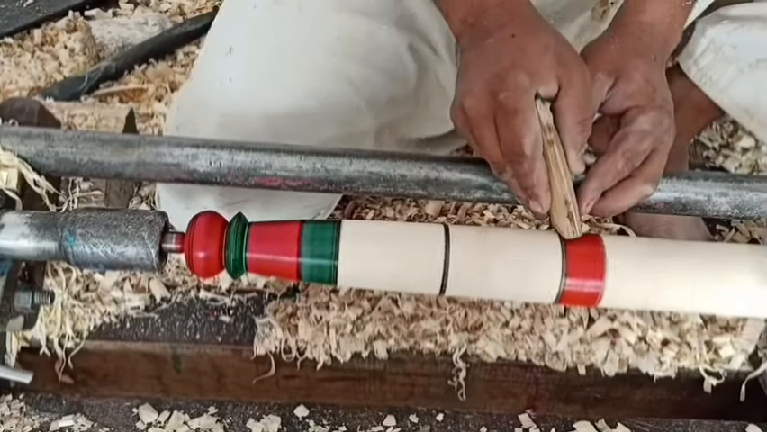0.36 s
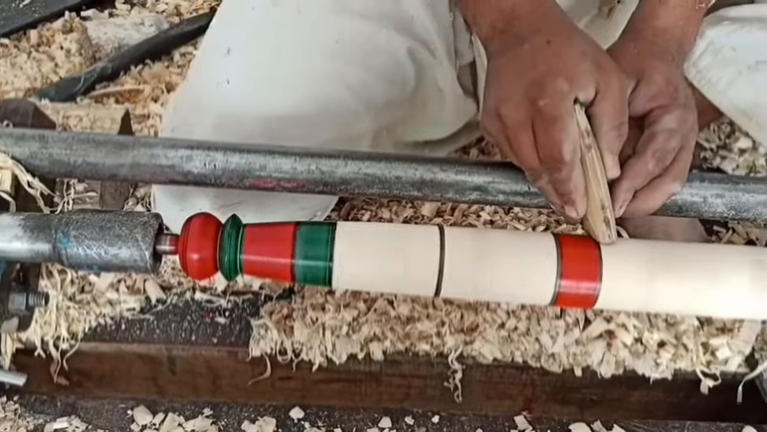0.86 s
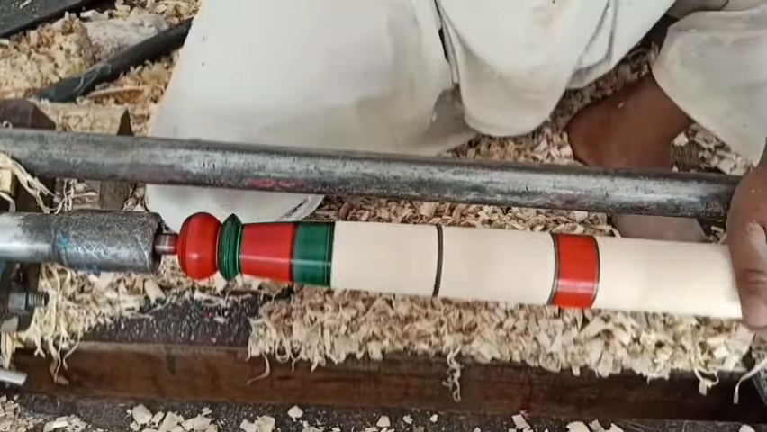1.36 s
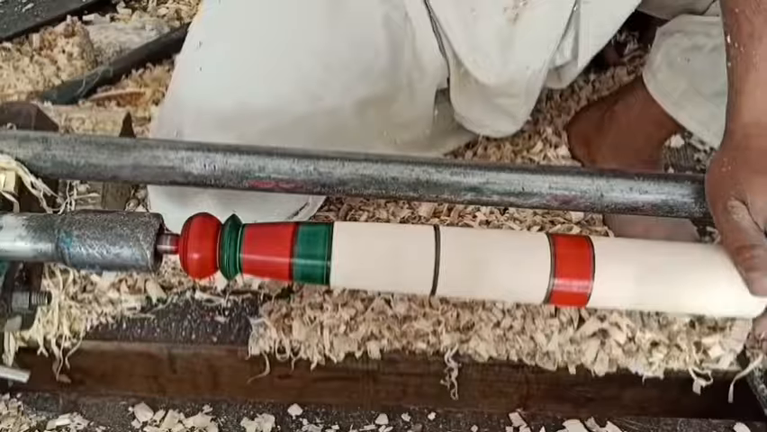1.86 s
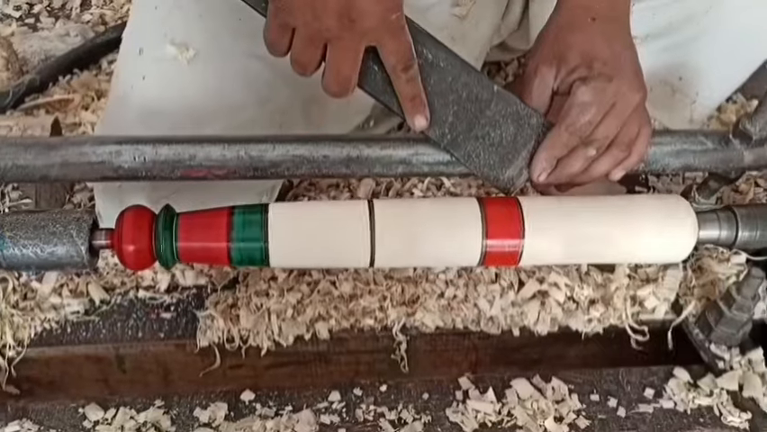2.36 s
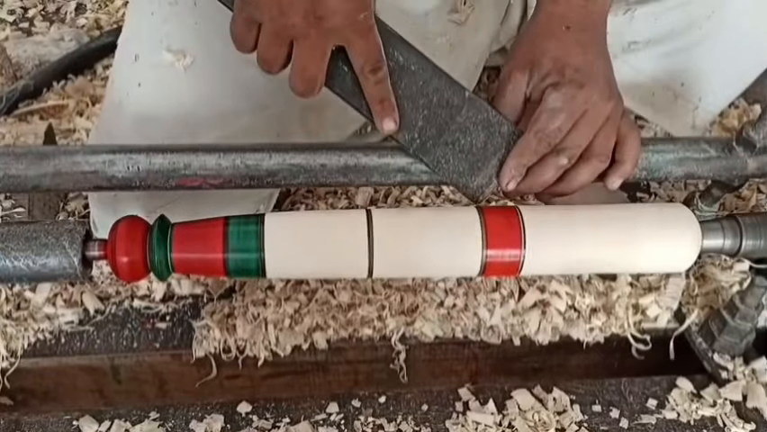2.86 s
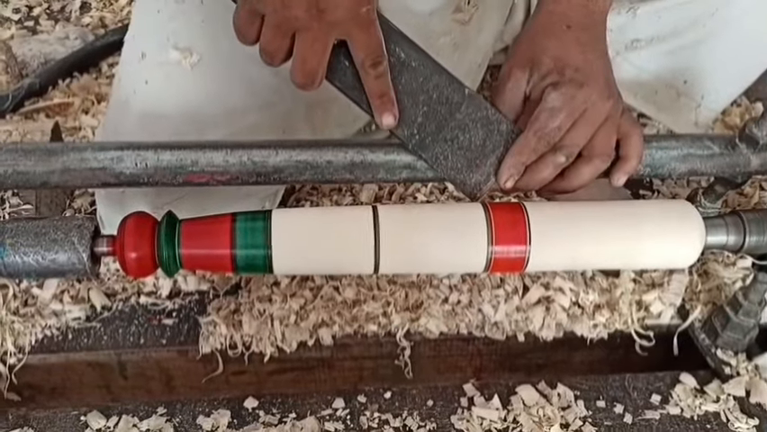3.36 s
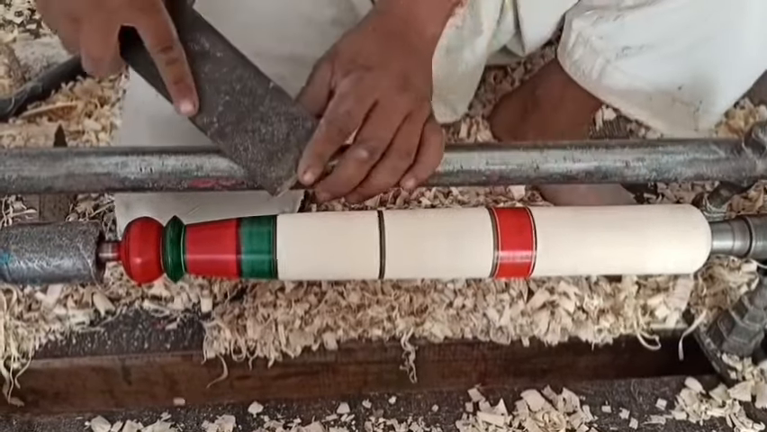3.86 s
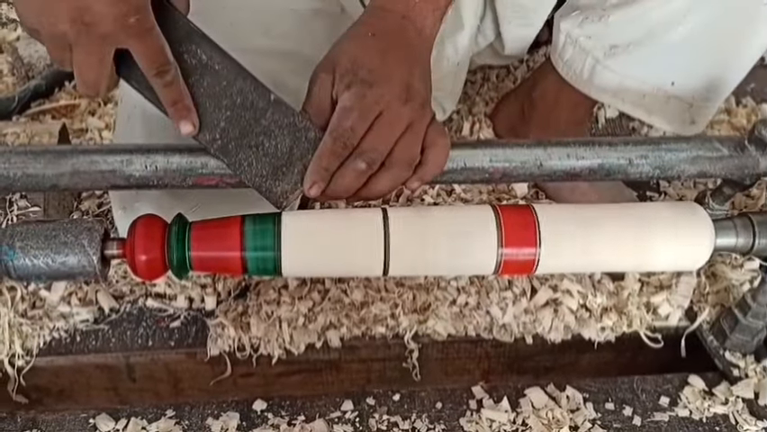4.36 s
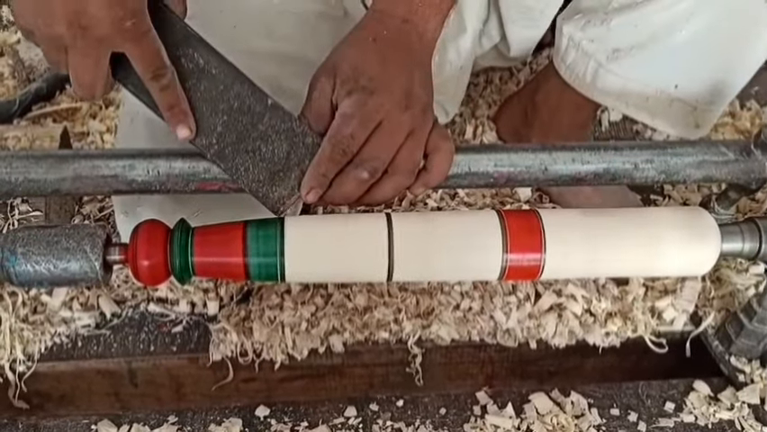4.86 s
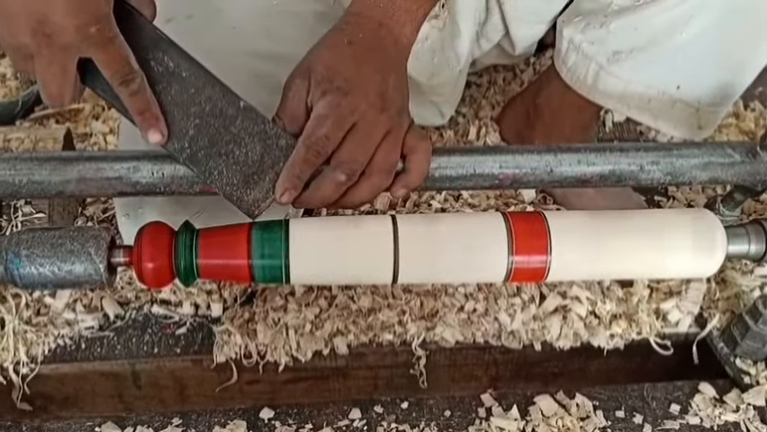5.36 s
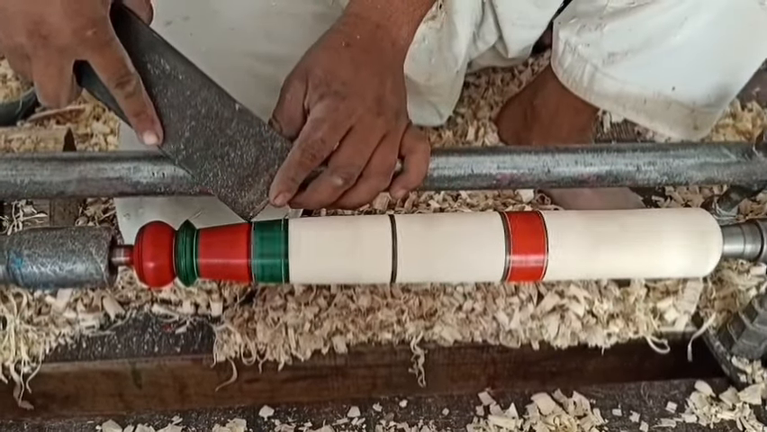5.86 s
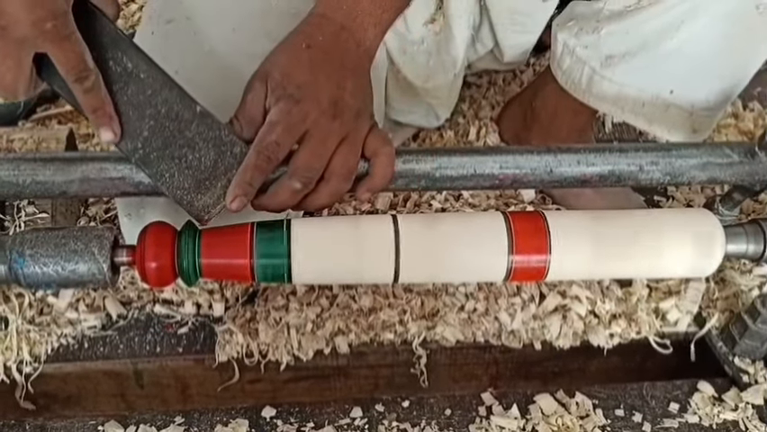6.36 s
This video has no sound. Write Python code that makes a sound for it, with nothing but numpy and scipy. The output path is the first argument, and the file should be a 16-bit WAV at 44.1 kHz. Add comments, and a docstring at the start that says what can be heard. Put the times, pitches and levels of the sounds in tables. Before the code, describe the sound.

A belt-driven wood lathe runs continuously for about 6.7 seconds, close to a stereo microphone in a small workshop, with no start or stop. A low motor hum near 100 Hz wavers with weaker overtones beneath a broad, rough roar and unsteady metallic ringing, brighter on the left. About six and a half times a second the belt joint passes: crisp high hiss flares sharply, then roar and hum sag briefly, giving a fast, slightly uneven chuffing flutter. A short high squeak comes near 1.1 s. Around 2.7 to 3.0 s soft low air puffs push on the left, with a rough squeak at 2.8. Fainter squeaks and puffs follow between 3.5 and 4.1, the clearest squeak at 4.1. The steady machine continues, with a slight puff and squeak near 6.0, another puff at 6.4, and a strong hiss flare near the end.

```python
"""In a small workshop, a belt-driven wood lathe idles at steady speed, close to a two-port microphone.
The motor hum is three wavering tones; the roar is shaped noise plus ringing tones for the lathe's parts.
The belt hiss is shaped noise too; once a lap the belt joint makes it flare while roar and hum sag.
Bearing squeaks are short rough whistles; fan air buffets mainly the left port with soft low pushes."""
import sys
import numpy as np
from scipy import signal
from scipy.io import wavfile
from scipy.ndimage import uniform_filter1d

SR = 44100
rng = np.random.default_rng(int(sys.argv[2]) if len(sys.argv) > 2 else 0)


def ratio_of_db(decibels):
    """Turn decibels (scalar or array-like) into linear amplitude factors; 0 dB maps to 1."""
    return 10 ** (np.asarray(decibels, float) / 20)


def file_out(sig):
    """Save sig as 16-bit WAV at sys.argv[1]."""
    # one column per channel
    cols = np.atleast_2d(sig).T
    # limit, then scale
    lim = np.clip(cols, -1, 1)
    pcm = np.round(lim * 32767).astype(np.int16)
    wavfile.write(sys.argv[1], SR, pcm)


N = 296352  # length of the scene in samples


def evened(x):
    """Scales a signal to an average strength (rms) of 1."""
    return x / np.sqrt(np.mean(abs(x) ** 2) + 1e-20)


def read(points, hz):
    """Reads a table of (frequency, value) between its rows, on a log-frequency axis."""
    f, value = np.transpose(points)
    return np.interp(np.log(hz + 1), np.log(f + 1), value)


def curve(rows, column):
    """Joins the rows of a time table by straight lines and reads one column at every sample."""
    table = np.transpose(rows)
    return np.interp(np.arange(N) / SR, table[0], table[column])


def wandering(width_hz):
    """A slow random phasor of rms 1: multiplying a tone by it spreads the tone over the given width."""
    slow = np.arange(0, N + 64, 64)  # one random step every 64 samples
    re, im = rng.standard_normal((2, len(slow)))
    memory = np.exp(-np.pi * width_hz * 64 / SR)
    z = evened(signal.lfilter([1], [1, -memory], re + 1j * im))
    return np.interp(np.arange(N), slow, z.real) + 1j * np.interp(np.arange(N), slow, z.imag)


LAP_HZ = 6.525  # average belt laps a second
FIRST_PASS_S, LAP_SCATTER_S = -0.007, 0.0075
USUAL_DB = [3.9, 1.53, 3.1]  # usual hiss flare, roar sag and hum sag
UNEVEN = 0.14  # share by which the usual passes differ
# Marked passes of the belt joint, a negative sag being a swell:
# (time [s], hiss flare [dB], roar sag [dB], hum sag [dB])
MARKED_PASSES = [(.145, 4.5, 9, 8), (.294, 8.5, 2, 9), (.62, 4, 1, 7), (.75, 6, 4.5, 6), (.93, 3.5, 1, 10),
                 (1.083, 3.5, 1, 3), (1.225, 5.5, 2, 19), (1.37, 1, 0.5, 3), (1.53, 6, 5.5, 11),
                 (1.83, 4.5, 7, 12), (2.135, 4.5, 0.5, 8), (2.285, 7, 3.5, 13), (2.59, 4.5, 4, 1),
                 (2.76, 3, 4, 9), (3.06, 4, 3, 12), (3.2, 5.5, 4.5, 8), (3.355, 6.5, 1.5, 9),
                 (3.665, 6, 5.5, 34), (3.81, 2, 1, 1.5), (3.986, 6.5, 4, 6), (4.117, 5.5, 4.5, 13),
                 (4.29, 4, 3, -4), (4.59, 5.5, 4.5, 12), (4.74, 5, 2, 10), (4.904, 5.5, -0.5, 6),
                 (5.049, 5.5, 6, 19), (5.195, 4.5, 2.5, 3), (5.375, 2, 2, 9), (5.51, 5, 4.5, 5),
                 (5.83, 5, 5.5, 17), (5.965, 3, 4, 2), (6.425, 4.5, 3, 19), (6.58, 9, 3.5, 5)]


def passes():
    """Time, flare and sags of every pass of the joint: uneven by chance, except for the marked ones."""
    chance = rng.standard_normal((int(LAP_HZ * N / SR) + 2, 4))
    times = FIRST_PASS_S + np.arange(len(chance)) / LAP_HZ + LAP_SCATTER_S * chance[:, 0]
    rows = np.column_stack([times, USUAL_DB * np.exp(UNEVEN * chance[:, 1:])])
    for row in MARKED_PASSES:
        lap = round(LAP_HZ * (row[0] - FIRST_PASS_S))
        rows[lap] = row
    return rows.T


def joint(times, depth_db, late_s, rise_s, fall_s):
    """A dB curve with one hump for every pass of the joint, peaking late_s after the pass."""
    t = np.arange(0, N + 128, 128) / SR
    since = t - times[:, None] - late_s
    spread = np.where(since < 0, rise_s, fall_s)
    humps = depth_db @ np.exp(-.5 * (since / spread) ** 2)
    return np.interp(np.arange(N) / SR, t, humps)


HUM_WIDTH_HZ, HUM_STEADY = 2.8, 0.73  # width of the wavering part, share of the steady part
# Slow drift of the motor hum, levels being rms before the joint makes them sag:
# (time [s], main tone [Hz], main level [dB], level of the 199.5 Hz tone [dB], level of the 699 Hz tone [dB])
HUM_DRIFT = [(0, 96.4, -59, -39, -37), (.1, 96.2, -31.5, -61.5, -42), (.3, 102.6, -41.5, -44, -38.5),
             (.55, 99.4, -41, -45, -38.5), (.85, 98, -38, -46, -43), (1.1, 100.8, -36, -56, -40),
             (1.42, 101.5, -35, -47, -40.5), (1.6, 100, -38, -60.5, -47), (1.9, 98, -43, -59, -41),
             (2.25, 94.2, -42, -48, -44), (2.6, 99, -42, -59, -40.5), (2.88, 102.5, -50, -49, -41),
             (3.15, 94.5, -44, -60, -46), (3.48, 101.7, -41.5, -47, -43.5), (3.9, 98.4, -37, -51, -42),
             (4.3, 97, -44, -50, -48.5), (4.55, 100.8, -41, -50.5, -47), (4.9, 100.5, -40, -45, -39),
             (5.2, 99.3, -38, -51.5, -43), (5.45, 100.2, -39, -53, -46), (5.65, 97, -40, -45, -40),
             (6.0, 99.5, -43.5, -50, -41.5), (6.25, 101, -37, -46, -42), (6.45, 98.4, -37.5, -54, -40),
             (6.72, 96.3, -40, -42, -46)]


def hum(times, sag_db):
    """A wavering tone near twice the mains frequency and two overtones, alike at both ports; all sag."""
    t = np.arange(N) / SR
    sag_db = joint(times, sag_db, late_s=0.0055, rise_s=0.023, fall_s=.024)
    drift = evened(HUM_STEADY + (1 - HUM_STEADY) * wandering(HUM_WIDTH_HZ))
    turns = np.cumsum(curve(HUM_DRIFT, column=1)) / SR
    out = ratio_of_db(curve(HUM_DRIFT, column=2) - sag_db) * (drift * np.exp(2j * np.pi * turns)).real
    for column, hz, width_hz, soft in [(3, 199.5, 11., .8), (4, 699, 9., .25)]:
        drift = wandering(width_hz)
        drift = evened(drift / (abs(drift) + soft))  # a smaller soft gives a steadier strength
        level = ratio_of_db(curve(HUM_DRIFT, column) - 0.54 * sag_db)  # overtones sag about half as deeply
        out += level * (drift * np.exp(2j * np.pi * hz * t)).real
    return np.sqrt(2) * out


# How alike the noise is at the two ports: (frequency [Hz], likeness [-1 to 1])
LIKENESS = [(60, 0.065), (110, 1), (200, 1), (380, 1), (700, 0.27), (1290, -0.044), (2380, -0.034),
            (4400, 0.018), (8120, -0.044), (15000, 0.077)]
# How much stronger the noise is at the left port: (frequency [Hz], left minus right [dB])
LEFT_EXCESS = [(60, -3), (110, -1), (200, 0), (380, -0.5), (700, -0.5), (1290, 0), (2380, 3.5), (4400, 0),
               (8120, 2.5), (15000, 0)]


def noise(points, size, patchy_db, flicker_db):
    """Two-port noise of rms 1 from random short spectra, with drifting patches and an all-band flicker."""
    frames, hz = 4 * N // size + 5, np.fft.rfftfreq(size, 1 / SR)
    a, b, c, d, patches = rng.standard_normal((frames, len(hz), 5)).T
    patches = uniform_filter1d(patches, size // 256 + 1, axis=0)  # smooth over frequency
    patches = evened(uniform_filter1d(patches, 8192 // size, axis=1))  # smooth over time
    flicker = evened(uniform_filter1d(rng.standard_normal(frames), 2048 // size))
    same = np.clip(read(LIKENESS, hz), -1, 1)[:, None]
    left = a + 1j * b
    right = same * left + np.sqrt(1 - same ** 2) * (c + 1j * d)
    z = np.array([left, right])
    z *= ratio_of_db(read(points, hz)[:, None] + patchy_db * patches + flicker_db * flicker)
    z *= ratio_of_db(np.outer([.5, -.5], read(LEFT_EXCESS, hz)))[:, :, None]
    sound = signal.istft(z, nperseg=size, noverlap=size * 3 // 4)[1]
    return evened(sound[:, :N])


# Ringing parts, width and level being those before the steadying and the overall trim:
# (frequency [Hz], width [Hz], level [dB], left minus right [dB], left lead [turns], steady share [0-1])
RINGING_PARTS = [(232.1, 18, -51, -1, 0.12, 0), (343.4, 11, -49, 0.5, 0.12, 0),
                 (497, 11, -54.5, -4, 0, 0.7), (657.4, 29, -48, 2, 0.18, 0), (744.4, 44, -44, 0, 0, 0),
                 (1227, 4, -48, 5, 0.12, 1), (1436, 15, -46.5, 16, 0.52, 0.57),
                 (1738, 33, -42.5, 10.5, 0.42, 0), (1848, 12, -40, 6, 0.41, 0.1),
                 (2135, 53, -47, 10, 0.92, 0), (2365, 56, -54.5, 15, 0.032, 0),
                 (2415, 33, -49.5, 9, 0, 0.4), (2782, 32, -43.5, 9, 0.32, 0.2),
                 (3068, 35, -44, 7, 0.26, 0.24), (4800, 54, -58, 5, 0.21, .1),
                 (5300, 83, -47.5, 0, 0.16, 0), (5640, 60, -46, -12, 0.33, 0), (6120, 40, -44, 17, 0.55, 0),
                 (6600, 60, -47, 16, 0.93, 0.1), (13500, 55, -45, 8, 0.32, 0.6),
                 (14000, 90, -53, 4, .6, .1), (14450, 80, -47, 16, 0.53, .1), (15060, 90, -49, 7, 0.96, .1)]


def rings(rustle_db):
    """Each part is a tone whose strength and phase wander; it also swells in short rustles."""
    t, out = np.arange(N) / SR, np.zeros((2, N))
    for hz, width_hz, db, left_db, lead, steady in RINGING_PARTS:
        drift = wandering(width_hz)
        even_drift = drift / (abs(drift) + 0.093)  # phase wanders, strength hardly does
        drift = steady * even_drift + (1 - steady) * drift
        drift = evened(drift * ratio_of_db(rustle_db * wandering(4.5).real))
        tone = np.sqrt(2) * ratio_of_db(db) * drift * np.exp(2j * np.pi * hz * t)
        out[0] += ratio_of_db(left_db / 2) * (tone * np.exp(2j * np.pi * lead)).real
        out[1] += ratio_of_db(-left_db / 2) * tone.real
    return out


ROAR_DB, RINGS_TRIM_DB = -28.5, 0.45  # rms of the roar noise, trim on all ringing parts
# Tone colour of the frame and motor: (frequency [Hz], relative level [dB])
ROAR_COLOUR = [(15, -59), (25, -39), (60, -35), (97, 2.5), (135, -11), (339, -10), (421, -10), (716, -3.5),
               (1130, -6.5), (1220, -8), (1590, -8), (2390, -1.5), (4270, -11.5), (6130, -8.5),
               (8000, -41.5), (10400, -117), (17600, -120)]


def roar(times, sag_db):
    """Frame and motor noise plus ringing parts; all sag as the joint slips over the pulley."""
    rumble = ratio_of_db(ROAR_DB) * noise(ROAR_COLOUR, size=1024, patchy_db=0.9, flicker_db=1.48)
    ringing = ratio_of_db(RINGS_TRIM_DB) * rings(rustle_db=4.0)
    sag = joint(times, sag_db, late_s=0.0033, rise_s=.014, fall_s=.02)
    return (rumble + ringing) * ratio_of_db(-sag)


HISS_DB = -29.5  # rms between flares
# Tone colour of the belt and bearings: (frequency [Hz], relative level [dB])
HISS_COLOUR = [(2060, -15), (3500, -5), (4290, -10), (5000, -2.5), (6240, -0.5), (7090, -6), (7650, -4),
               (8200, -21), (10400, -20), (10800, -9.5), (12300, -5), (14500, -3), (15400, -6),
               (16500, -10.5)]


def hiss(times, flare_db):
    """Belt and bearing noise that flares as the joint scrapes, just before the roar sags."""
    steady = ratio_of_db(HISS_DB) * noise(HISS_COLOUR, size=256, patchy_db=2.5, flicker_db=1.5)
    return steady * ratio_of_db(joint(times, flare_db, late_s=-0.014, rise_s=0.003, fall_s=0.027))


# Puffs of fan air, level being the top of the swell at the left port and length two standard deviations:
# (time [s], level [dB], length [s])
AIR_PUFFS = [(2.69, -33, 0.017), (2.718, -30, 0.017), (2.986, -34, 0.017), (3.464, -37, 0.022),
             (3.771, -33, 0.031), (4.05, -34, .02), (5.92, -35, .03), (6.378, -38, 0.04)]


def air():
    """Each puff is a soft low push with lumpy noise, mostly on the left port, over a faint steady rumble."""
    t = np.arange(N) / SR
    band = signal.butter(2, [50, 220], "bandpass", fs=SR, output="sos")
    lumps = evened(signal.sosfilt(band, rng.standard_normal(N)))
    out = ratio_of_db(-54.0) * lumps
    for s, db, length_s in AIR_PUFFS:
        swell = ratio_of_db(db) * np.exp(-.5 * ((t - s) / length_s * 2) ** 2)
        out += swell * (np.sin(2 * np.pi * 124.0 * (t - s)) + 0.41 * lumps)
    return np.outer([1, .15], out)


# Short bearing squeaks, level being the top of the swell before the port shares, length as two
# standard deviations: (time [s], pitch [Hz], level [dB], length [s])
BEARING_SQUEAKS = [(1.071, 5620, -30, .06), (2.774, 3085, -29.5, 0.085), (2.78, 6120, -36, 0.072),
                   (3.518, 5600, -37, .06), (3.7, 5620, -36, .06), (3.983, 5620, -35, 0.055),
                   (4.064, 3100, -37, .08), (4.111, 6130, -29, 0.059), (5.99, 5620, -36, 0.059)]


def squeaks():
    """Short whistles, roughened by fast random wandering and stronger at the left port."""
    t, out = np.arange(N) / SR, np.zeros(N)
    for s, hz, db, length_s in BEARING_SQUEAKS:
        rough = evened(1.0 + wandering(60.))
        whistle = (rough * np.exp(2j * np.pi * hz * t)).real
        out += ratio_of_db(db) * np.exp(-.5 * ((t - s) / length_s * 2) ** 2) * whistle
    return np.outer([1.3, .7], out)


def scene():
    """Adds up all the sounds at the two ports; hum, roar and hiss share the same joint passes."""
    times, flare_db, roar_sag_db, hum_sag_db = passes()
    lathe = hum(times, hum_sag_db) + roar(times, roar_sag_db) + hiss(times, flare_db)
    return lathe + air() + squeaks()


def roll_off(x):
    """The treble ends steeply here."""
    return signal.sosfilt(signal.butter(12, 15520, fs=SR, output="sos"), x)


def record(dry):
    """The microphone drops the deep bass, below about 70 Hz."""
    bass_cut = signal.butter(2, 70, "highpass", fs=SR, output="sos")
    thin = signal.sosfilt(bass_cut, dry)
    return roll_off(thin)


dry = scene()
out = record(dry)
file_out(out)
```